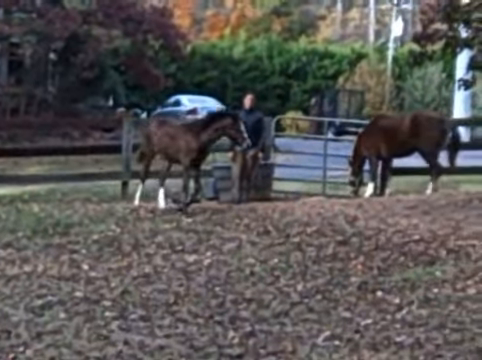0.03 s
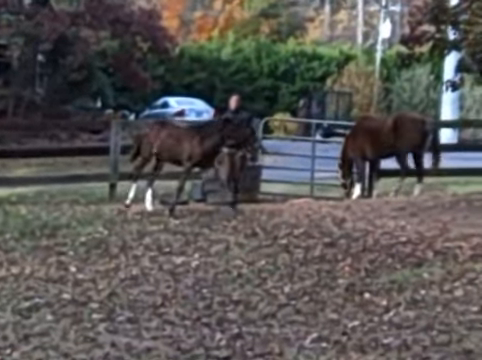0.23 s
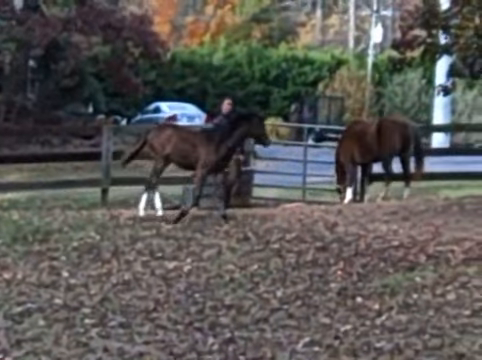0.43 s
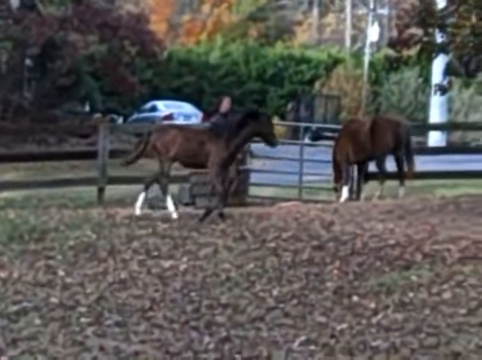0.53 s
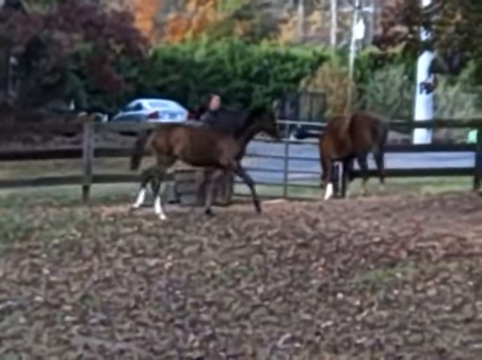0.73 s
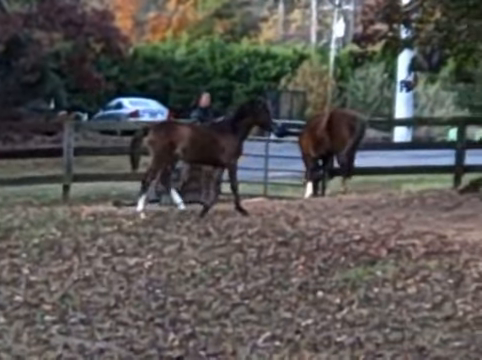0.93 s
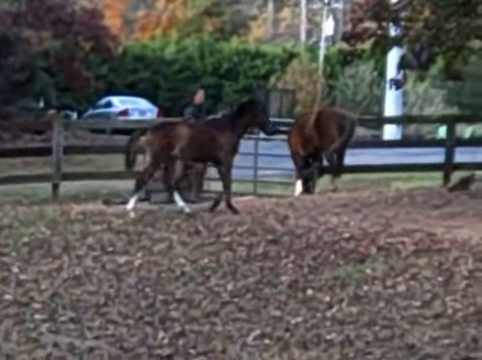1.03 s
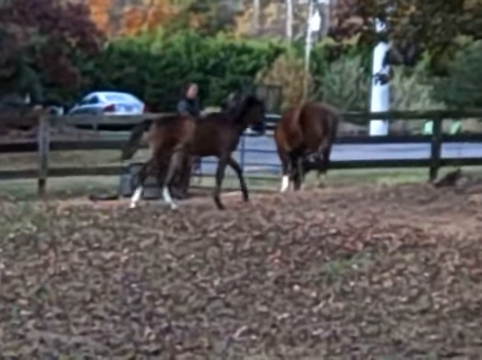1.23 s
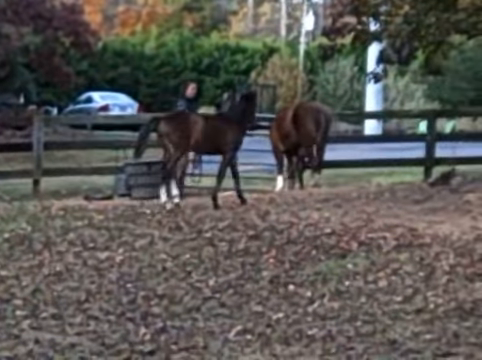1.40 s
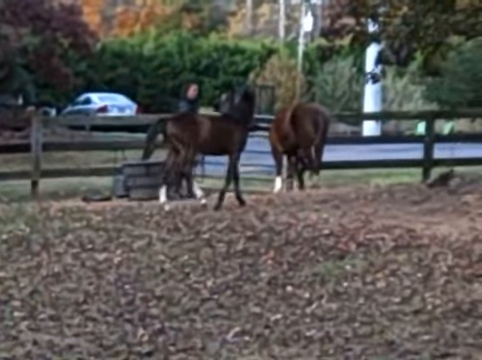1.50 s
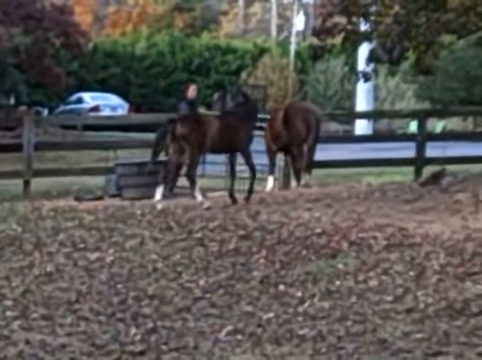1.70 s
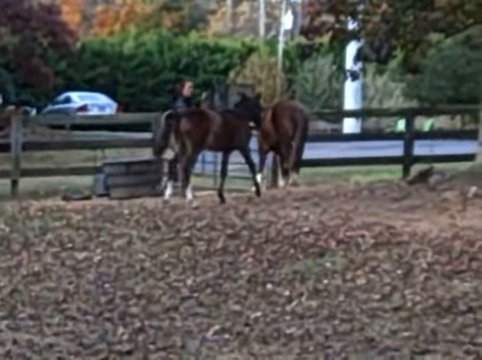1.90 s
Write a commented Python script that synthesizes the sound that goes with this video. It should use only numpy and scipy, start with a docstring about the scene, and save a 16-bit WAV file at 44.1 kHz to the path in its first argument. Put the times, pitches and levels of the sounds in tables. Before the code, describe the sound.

A horse gives one long, quavering neigh outdoors, with faint hoof steps in dry leaves.

```python
"""A soft rustle of hooves in dry leaves, then a horse gives one long neigh across an open paddock.
Its voice box sounds two pitches at once: a buzzing voice and a high whistle. The call starts with a
rasp, holds clean, then quavers about seven times a second, growing hoarse, and ends in blown air and
a few throat pops. Fences and trees send back echoes over a faint outdoor rush and a low rumble."""
import sys
import numpy as np
from scipy import signal
from scipy.fft import rfft, irfft
from scipy.io import wavfile

SR = 44100
rng = np.random.default_rng(int(sys.argv[2]) if len(sys.argv) > 2 else 0)


def pcm_store(signal):
    """Save signal as 16-bit PCM."""
    levels = np.round(np.clip(np.atleast_2d(signal), -1, 1) * 32767)
    wavfile.write(sys.argv[1], SR, levels.astype(np.int16).T)


N = 85995
TIME = np.arange(N) / SR
FREQUENCIES = np.linspace(0, SR / 2, N + 1)

# the lower voice rises, holds, then quavers ever more deeply (time [s], pitch [Hz])
VOICE_PITCH = [(.19, 486.3), (.24, 477.8), (.28, 500), (.32, 505), (.35, 526.8), (.62, 527.6), (.65, 537.6),
               (.678, 556.1), (.705, 525), (.74, 546.8), (.775, 561.6), (.805, 539.1), (.84, 513.5),
               (.88, 536.8), (.92, 548.1), (.96, 524), (.985, 480.8), (1.01, 528), (1.055, 547.4),
               (1.10, 519.2), (1.145, 497.6), (1.19, 530.6), (1.225, 506.8), (1.29, 458.3), (1.345, 516.6),
               (1.373, 471), (1.39, 505.4), (1.44, 449.8), (1.49, 489.4), (1.52, 519.9), (1.56, 484.1),
               (1.61, 444.5), (1.645, 513.3), (1.665, 499.7), (1.70, 452)]
# how hoarse it is (time [s], pitch shake [share of the pitch], strength of in-between tones [0-1])
HOARSENESS = [(.2, .05, 0.35), (.27, 0.0069, 0.16), (.36, 0.0012, 0.16), (.52, 0.0024, 0.05),
              (.62, 0.0085, 0.04), (.68, .012, 0), (.9, .013, 0), (1.05, .013, .05), (1.14, 0.031, 0.46),
              (1.2, 0.015, 0.04), (1.27, 0.0299, .45), (1.35, 0.024, 0.14), (1.43, .05, 0.23),
              (1.49, .015, 0.09), (1.58, 0.056, 0.9), (1.65, 0.028, 0.31), (1.7, 0.065, 0.05)]
FULLY_HOARSE_SHAKE, FLUTTER_HZ = .034, 40.4

def neigh():
    """One voice box makes the buzz, whistle, air and pops; the hoarser it is, the more it flutters."""
    (hz,) = in_time(VOICE_PITCH)
    shake, between = in_time(HOARSENESS)
    phase = shaky_phase(hz, shake)
    hoarse = np.clip(shake / FULLY_HOARSE_SHAKE, 0, 1)
    flutter = from_db(1.5 * hoarse * drift(FLUTTER_HZ))
    breath = low_breath()
    tones = voice(hz, phase, between, hoarse) + whistle(phase, shake)
    return colour_call(flutter * tones + throat_air(phase) + pops()) + breath + voice_break(phase)


# how hard the lower voice sounds (time [s], level [dB])
VOICE_LEVEL = [(.15, -84.5), (.168, -68.5), (.184, -69), (.192, -51), (.25, -52), (.31, -49), (.36, -53),
               (.43, -46.5), (.52, -42.5), (.57, -38), (.63, -39.5), (.68, -37), (.73, -41), (.84, -37.5),
               (.89, -41.5), (.96, -39.5), (.98, -39), (.993, -31.5), (1.005, -42.5), (1.06, -37.5),
               (1.09, -38.5), (1.105, -43), (1.122, -40), (1.14, -47), (1.17, -41), (1.22, -36.5),
               (1.29, -46.5), (1.355, -36), (1.372, -45.5), (1.384, -45.5), (1.390, -33.5), (1.402, -46),
               (1.415, -49.5), (1.46, -45), (1.495, -36.5), (1.53, -40), (1.565, -58), (1.6, -50.5),
               (1.635, -42.5), (1.665, -44.5), (1.71, -62), (1.78, -64)]
# which tones the throat and nose favour (frequency [Hz], level [dB])
THROAT_SHAPE = [(250, -38), (440, -41), (550, -16), (680, -30.5), (900, -28.5), (1090, -15.5), (1230, -6.5),
                (1420, 1), (1600, -2), (1800, -5), (2080, 6.5), (2280, -10), (2450, -19.5), (2640, -7.5),
                (2900, -29.5), (3150, -33), (3400, -14.5), (3750, -14), (4000, -28), (4600, -32),
                (6300, -37.5), (7300, -48), (8500, -76.5)]
# how sharply they are picked out, easing as the mouth opens (time [s], shape multiplier [times])
THROAT_FOCUS = [(.25, 1), (.5, 1.19), (.6, 1.3), (.67, 1.08), (.8, 0.98), (.95, 0.81), (1.1, 1.12),
                (1.22, 0.9), (1.35, 1.0), (1.5, 0.97), (1.7, 0.8)]

def voice(hz, phase, between, hoarse):
    """The vocal folds buzz through the throat; uneven beats add tones between the usual overtones."""
    (db,), (focus,) = in_time(VOICE_LEVEL), in_time(THROAT_FOCUS)
    buzz, power = 0, 0
    for k in range(2, 33):  # steps of half the pitch: odd steps are the in-between tones
        strength = between if k % 2 else from_db(4 * hoarse * drift(FLUTTER_HZ))
        gain = strength * gain_at(THROAT_SHAPE, hz * k / 2) ** focus
        wander = .09 * hoarse * drift(FLUTTER_HZ)
        buzz += gain * np.sin((phase + wander) * k / 2 + rng.uniform(0, 2 * np.pi))
        power += gain ** 2 / 2
    return from_db(db) * buzz / np.sqrt(power)


# the whistle's path (time [s], pitch [Hz], level [dB])
WHISTLE_PATH = [(.18, 1660, -82), (.21, 1648, -67.5), (.24, 1637, -51.5), (.265, 1702, -43),
                (.315, 1737, -45.5), (.35, 1765, -63), (.39, 1761, -47), (.435, 1795, -49.5),
                (.465, 1807, -40.5), (.535, 1821, -42), (.565, 1764, -54.5), (.63, 1793, -40),
                (.68, 1775, -48.5), (.75, 1800, -47), (.83, 1725, -48.5), (.89, 1763, -42),
                (.97, 1745, -49), (1.03, 1724, -44), (1.1, 1730, -54), (1.2, 1713, -46.5),
                (1.3, 1792, -75.5)]
# tones made by adding the two pitches (whistle pitch [times], voice pitch [times])
BLEND_TONES = [(1, 0), (1, 1), (1, 3), (2, -3), (2, 0)]
# how strong each of those tones is (level [dB])
BLEND_LEVELS = [-2.5, -19, -22.5, -11, -36.5]

def whistle(voice_phase, voice_shake):
    """The high second pitch mixes with the voice, making extra tones above itself."""
    hz, db = in_time(WHISTLE_PATH)
    phase = shaky_phase(hz, .6 * voice_shake)
    tones = sum(from_db(level) * np.sin(a * phase + b * voice_phase)
                for (a, b), level in zip(BLEND_TONES, BLEND_LEVELS))
    return np.sqrt(2) * from_db(db) * tones


# air rushing through the throat (time [s], level [dB])
AIR_LEVEL = [(.15, -72), (.182, -68), (.191, -55), (.235, -60.5), (.28, -74.5), (.36, -59), (.48, -58),
             (.6, -50.5), (.67, -51), (.85, -45.5), (1.0, -45.5), (1.25, -47), (1.4, -50.5), (1.53, -64),
             (1.58, -52), (1.66, -68), (1.71, -52.5), (1.76, -65), (1.84, -55), (1.885, -64), (1.91, -86.5),
             (1.95, -84)]
# how the throat and nose shape its hiss (frequency [Hz], level [dB])
AIR_SHAPE = [(200, -35.5), (500, -31), (680, -48), (820, -19.5), (980, -22.5), (1200, -23.5), (1420, -13.5),
             (1650, 1.5), (1850, -7), (2080, 5.5), (2350, -7), (2550, -12.5), (2950, -15.5), (3400, -0.5),
             (3800, -15), (4100, -26), (5200, -26), (6400, -28), (7400, -41.5), (8500, -57)]

def throat_air(voice_phase):
    """Swirling air hisses in the throat, chopped into puffs by the vocal folds."""
    puffs = rng.standard_normal(N) * (1 + .74 * np.cos(voice_phase))
    flutter = from_db(3.16 * drift(FLUTTER_HZ))
    return from_db(in_time(AIR_LEVEL)[0]) * shaped(puffs * flutter, AIR_SHAPE)


# narrow peaks and dips in the call's tone (frequency [Hz], width [Hz], boost [dB])
CALL_BANDS = [(400, 70, -2), (690, 93, -16), (972, 90, -20), (1270, 150, -1), (1351, 20, 1.5),
              (2390, 44, 8.5), (2605, 70, -11), (3370, 42, 1.5), (4230, 23, 16), (4760, 120, 6),
              (6150, 93, 5.5)]

def colour_call(sound):
    """Narrow peaks and dips give the call a ringing, hollow tone."""
    response = np.prod([1 + (from_db(db) - 1) / (1 + 2j * (FREQUENCIES - hz) / width)
                        for hz, width, db in CALL_BANDS], axis=0)
    return irfft(rfft(sound, 2 * N) * response)[:N]


# shrill overtones that flare up in the quavers (time [s], pitch [Hz], slide [Hz per s], level [dB])
SQUEALS = [(.6, 4240, 900.5, -58), (.815, 3780, -3000, -50.5), (.945, 3400, 0, -49),
           (1.09, 3620, -5000, -50), (1.225, 3450, 0, -52.5)]

def squeals():
    """Brief, slightly unsteady squeals about an octave above the whistle."""
    sound = 0
    for s, hz, slide, db in SQUEALS:
        phase = shaky_phase(hz + slide * (TIME - s), shake=.0054)
        sound += blip(phase, s, db, spread_s=.02)
    return sound


def voice_break(phase):
    """The voice cracks: a tone flashes up at three times the pitch of the octave below."""
    return blip(3 * phase / 2, s=1.262, db=-56, spread_s=.012)


# throat pops as the call dies (time [s], level [dB])
POP_TIMES = [(1.710, -58), (1.781, -45), (1.801, -45.5), (1.858, -40.5), (1.883, -45.5)]
# the tones in each pop (pitch [Hz], level [dB], time to fade by 60 dB [s])
POP_TONES = [(1420, -9.5, 0.017), (2034, 1.5, 0.025), (3397, -6.5, 0.025)]

def pops():
    """Single slack beats of the vocal folds make the throat ring."""
    sound, attack_s = 0, .00026
    for s, db in POP_TIMES:
        age = np.maximum(TIME - s, 0)
        onset = 1 - np.exp(-age / attack_s)
        for hz, level, fade_s in POP_TONES:
            faded_db = np.minimum(60 * age / fade_s, 200)
            sound += onset * from_db(db + level - faded_db) * np.sin(2 * np.pi * hz * age)
    return sound


# the low, breathy part of the call (time [s], level [dB])
BREATH_LEVEL = [(.15, -71), (.6, -79), (.95, -89), (1.22, -77.5), (1.26, -56), (1.33, -60), (1.45, -60.5),
                (1.6, -62.5), (1.85, -66.5), (1.95, -77)]
# its dull tone (frequency [Hz], level [dB])
BREATH_SHAPE = [(100, -35), (180, 0.5), (300, -3), (400, 7.5), (530, 11), (650, 3), (800, 10), (950, -10.5),
                (1400, -2), (3000, -45.5)]

def low_breath():
    """Air blows out with a low sound as the mouth opens."""
    return from_db(in_time(BREATH_LEVEL)[0]) * shaped(rng.standard_normal(N), BREATH_SHAPE)


# echoes from ground, fences and trees (delay [s], level [dB])
PADDOCK_ECHOES = [(.0133, -10), (.0342, -15.5), (.071, -16), (.118, -20)]
TAIL_FADE_S, TAIL_BUILD_S = .15, .0061

def paddock(call):
    """The call bounces back as a few clear echoes and a thin tail scattered by the trees."""
    tail = rng.standard_normal(N) * from_db(-60 * TIME / TAIL_FADE_S)
    tail *= 1 - np.exp(-TIME / TAIL_BUILD_S)
    echoes = sum(from_db(db) * np.interp(TIME - s, TIME, call, left=0) for s, db in PADDOCK_ECHOES)
    return echoes + from_db(-9.5) * signal.fftconvolve(call, tail / np.linalg.norm(tail))[:N]


# hooves brush through dry leaves (time [s], level [dB])
HOOF_STEPS = [(0.028, -63), (0.384, -63), (.55, -61), (1.702, -64.5), (1.819, -84)]
# the crisp tone of the leaves (frequency [Hz], level [dB])
LEAF_SHAPE = [(1000, -11), (2500, -15.5), (4000, 1), (5500, 0), (6800, -2), (7600, -13), (8600, -35)]
STEP_ATTACK_S, STEP_DECAY_S = .013, .093

def hooves():
    """Each step stirs a short rustle of leaves."""
    level = 0
    for s, db in HOOF_STEPS:
        age = np.maximum(TIME - s, 0)
        level += from_db(db) * (1 - np.exp(-age / STEP_ATTACK_S)) * np.exp(-age / STEP_DECAY_S)
    rustle = rng.standard_normal(N) * from_db(drift(200))
    return level * shaped(rustle, LEAF_SHAPE)


# the tone of the outdoor rush (frequency [Hz], level [dB])
RUSH_SHAPE = [(25, 1.5), (60, -1.5), (120, -3), (190, -4), (270, 6.5), (400, -9), (520, -13), (680, -12),
              (830, -9.5), (1100, -5), (1600, -24.5), (2100, -32.5), (2700, -9), (3400, -7), (4500, -18.5),
              (6500, -17), (7500, -28.5), (8600, -48)]
# a low rumble of the open air (time [s], level [dB])
RUMBLE_LEVEL = [(0, -74.5), (.5, -73), (.78, -66.5), (.92, -61), (1.15, -62), (1.4, -71), (1.95, -75.5)]
# its deep tone (frequency [Hz], level [dB])
RUMBLE_SHAPE = [(60, -29.5), (135, -24.5), (180, 1.5), (290, -2.5), (370, -8), (600, -43.5), (1500, -58)]

def outdoors():
    """A faint, nearly steady rush and a low rumble that swells and fades."""
    rush = from_db(-69.5 + 1.5 * drift(18)) * shaped(rng.standard_normal(N), RUSH_SHAPE)
    rumble = from_db(in_time(RUMBLE_LEVEL)[0]) * shaped(rng.standard_normal(N), RUMBLE_SHAPE)
    return rush + rumble


def from_db(db):
    """Turn decibels into a number to multiply by."""
    return 10 ** (np.asarray(db) / 20)


def rms_one(x):
    """Scale a signal to an average power of 1."""
    return x / np.sqrt(np.mean(x ** 2) + 1e-20)


def in_time(rows):
    """Join a table's points with straight lines: one curve for each column after the time."""
    s, *columns = np.transpose(rows)
    return [np.interp(TIME, s, column) for column in columns]


def gain_at(shape, hz):
    """How strongly a shape lets these frequencies through."""
    points_hz, db = np.transpose(shape)
    return from_db(np.interp(np.log(hz + 1), np.log(points_hz), db))


def shaped(sound, shape):
    """Set a sound's balance of low and high, at an average power of 1."""
    return rms_one(irfft(rfft(sound, 2 * N) * gain_at(shape, FREQUENCIES))[:N])


def drift(speed_hz):
    """A smooth random wobble with a typical size of 1."""
    r = np.exp(-2 * np.pi * speed_hz / SR)
    return rms_one(signal.lfilter([1], [1, -2 * r, r * r], rng.standard_normal(2 * N))[N:])


def shaky_phase(hz, shake):
    """The running angle of a wave whose pitch shakes at random."""
    return 2 * np.pi * np.cumsum(hz * (1 + shake * drift(speed_hz=183))) / SR


def blip(phase, s, db, spread_s):
    """A tone that swells and fades around time s."""
    swell = from_db(db) * np.exp(-.5 * ((TIME - s) / spread_s) ** 2)
    return np.sqrt(2) * swell * np.sin(phase)


def scene():
    """The horse, its echoes, its steps and the open air."""
    call = neigh() + squeals()
    return (call + paddock(call) + hooves() + outdoors())[None]


def record(dry):
    """The highest treble, above 8700 Hz, is cut steeply."""
    return signal.sosfilt(signal.ellip(10, .1, 80, 8700, fs=SR, output="sos"), dry)


dry = scene()
out = record(dry)
pcm_store(out)
```